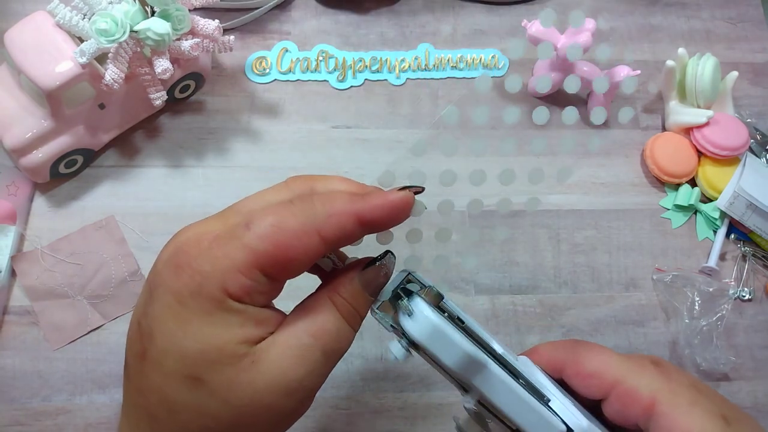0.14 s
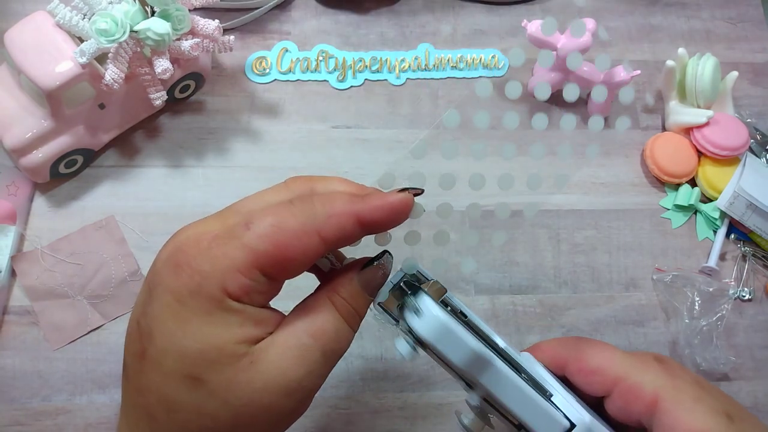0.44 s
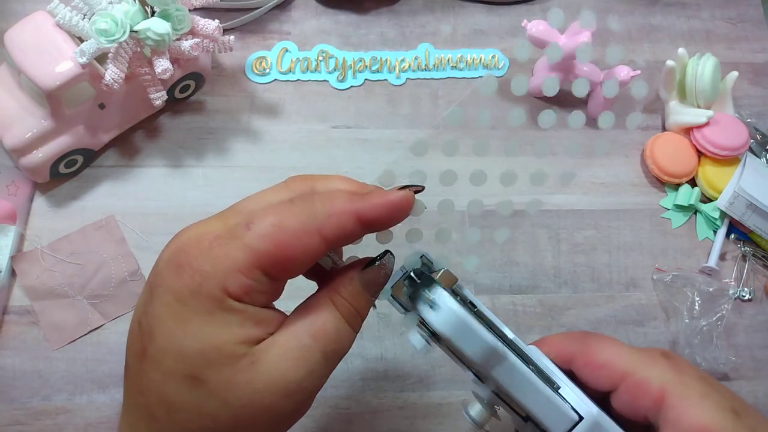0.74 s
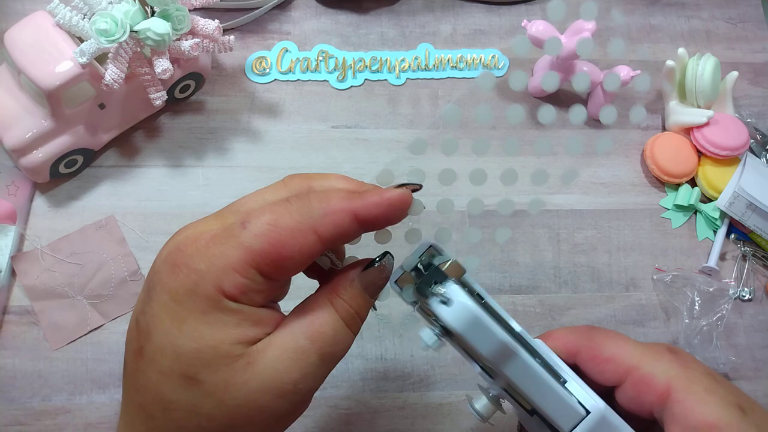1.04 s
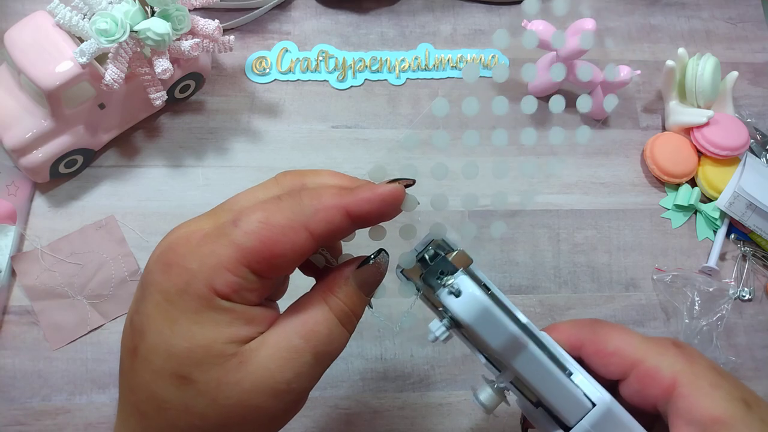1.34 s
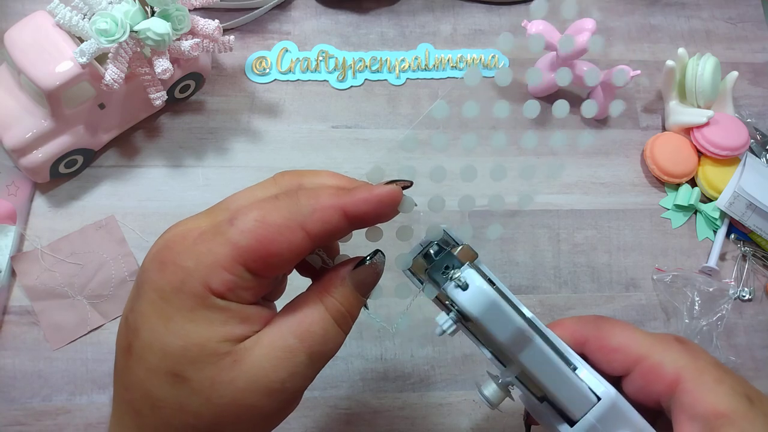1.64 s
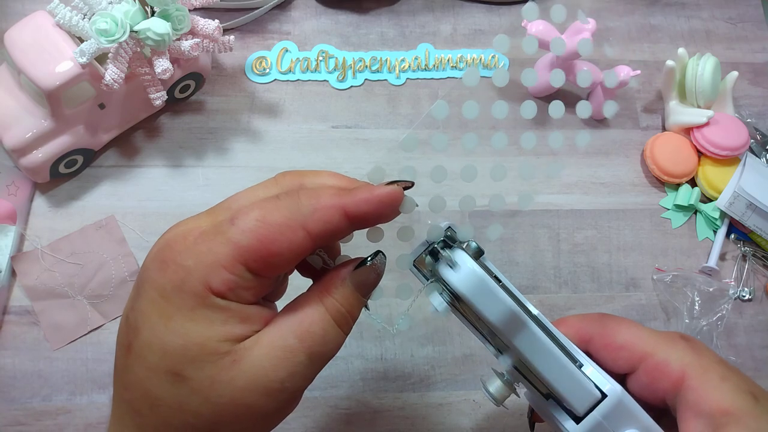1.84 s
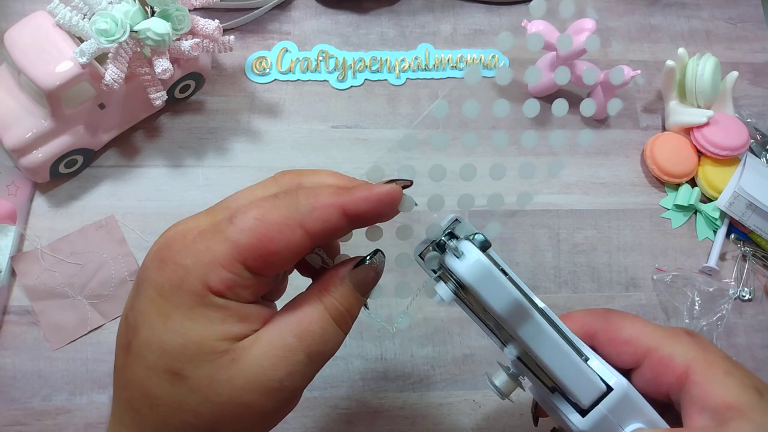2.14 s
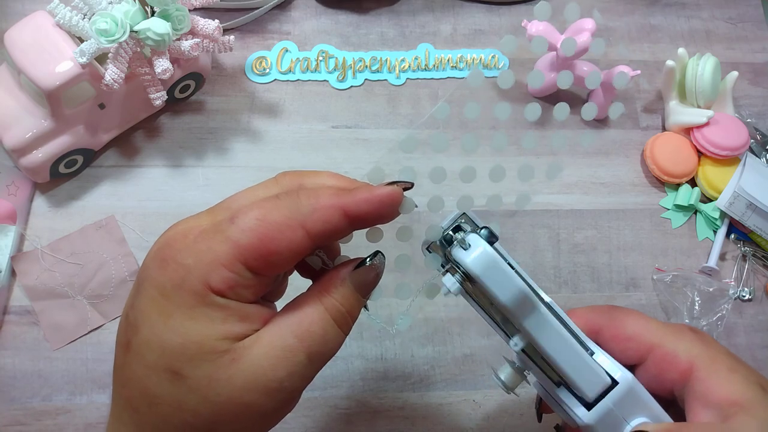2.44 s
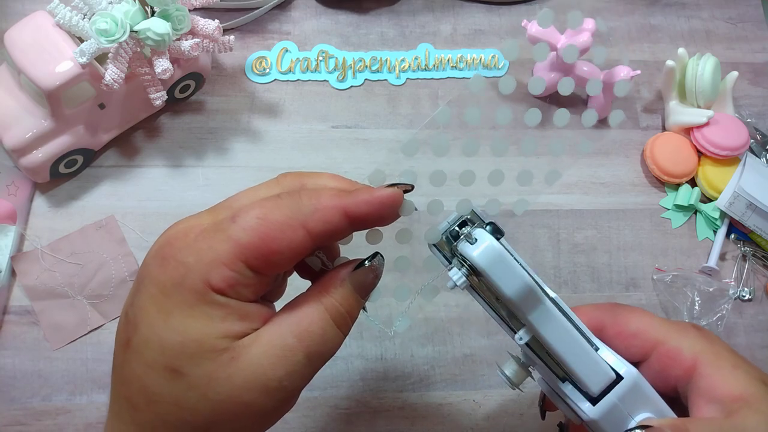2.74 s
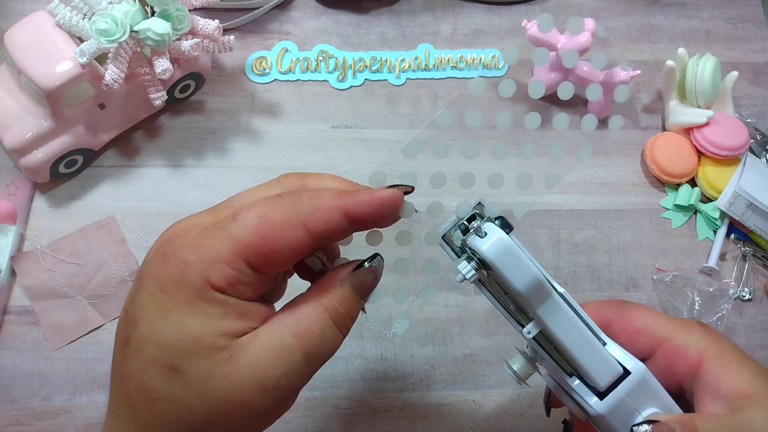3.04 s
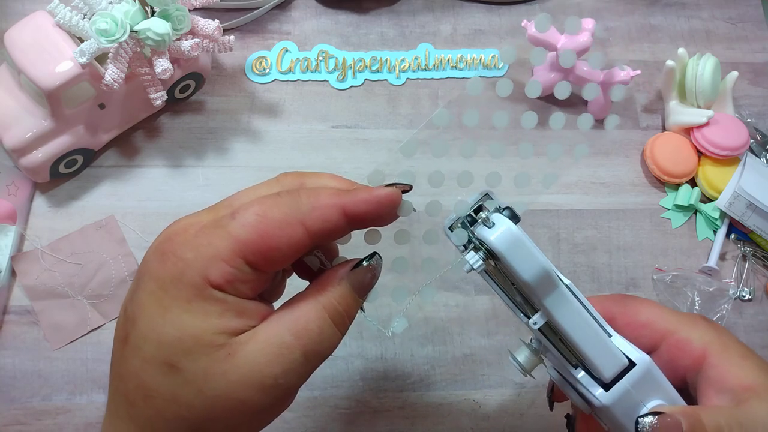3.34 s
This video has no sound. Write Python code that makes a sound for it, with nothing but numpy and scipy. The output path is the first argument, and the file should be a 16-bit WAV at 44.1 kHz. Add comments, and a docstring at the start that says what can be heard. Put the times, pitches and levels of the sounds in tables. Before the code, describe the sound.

Close up, a handheld sewing machine is already running and keeps going to the end: quick regular needle clatter, grainy gear rattle, pulsing high whine and faint motor hum, with a short indoor tail.

```python
"""Handheld sewing machine, close up

A small machine runs close to the microphones, about seven stitches a second through plastic sheet. Every turn
of the crank repeats one pattern: the needle arm clacks, the loose linkage chatters and the plastic gears
rattle, all noise bursts rung through the casing's resonances. Gear whine and a hum near 400 Hz are gliding
sines that swell and sag with the load. A short room tail and a faint low rumble lie underneath."""
import sys
import numpy as np
from scipy import signal
from scipy.fft import rfft, irfft
from scipy.io import wavfile
from scipy.ndimage import uniform_filter1d

SR = 44100
rng = np.random.default_rng(int(sys.argv[2]) if len(sys.argv) > 2 else 0)


def unload_wav(signal):
    """Save mono or channel-first audio to the path in sys.argv[1] as 16-bit WAV at rate SR, clipped to [-1, 1]."""
    wavfile.write(
        sys.argv[1],
        SR,
        np.round(np.clip(np.atleast_2d(signal).T, -1, 1) * 32767).astype(np.int16),
    )


N = 154350
TIME, FREQ = np.arange(N) / SR, np.fft.rfftfreq(N, 1 / SR)

# stitches, each begun by the needle arm's clack: t/s, relative level/dB
STITCH_TABLE = [(-.049, 0), (.096, -2), (.241, 1), (.387, 1), (.531, 3), (.676, -1), (.82, 1), (.964, 1),
                (1.109, 2.5), (1.254, 1), (1.398, -11), (1.543, 0.5), (1.69, -6), (1.836, 0), (1.981, 1.5),
                (2.128, 1), (2.275, -3), (2.421, -2.5), (2.568, 0), (2.715, -6), (2.861, -1), (3.006, 0),
                (3.153, 0.5), (3.301, 0.5), (3.448, -10), (3.594, 0)]
# rattle through one stitch: share of turn, relative levels of bass/dB, low/dB, middle/dB, treble/dB
RATTLE_CYCLE = [(.02, 0, -.5, -1, -1), (.09, -2, -6, -1.5, -1), (.16, -2, -3, -2, -1), (.21, 0, 3, 2, 0),
                (.27, 1, .5, 2.5, -.5), (.33, -1, 0, 3.5, -1.5), (.42, -1, -2, 0, 0), (.5, 0, 3.5, 0, 0),
                (.58, -2, -1.5, .5, 0), (.67, -4, -4.5, -1, -2), (.77, -4, 4, 1.5, 0), (.86, 2, 4, -2, -3),
                (.95, 5, -.5, -2, -2.5)]


def amp(db):
    """Decibels to gain."""
    return 10 ** (np.asarray(db) / 20)


def unit(x):
    """Scales to rms 1."""
    return x / np.sqrt(np.mean(x ** 2) + 1e-20)


def over_freq(table, column=1):
    """One column of a table, interpolated over log frequency."""
    table = np.array(table)
    return np.interp(np.log(FREQ + 1), np.log(table[:, 0]), table[:, column])


def high_pass(hz, order=4):
    """Butterworth high-pass gain over FREQ."""
    return 1 / np.sqrt(1 + (hz / (FREQ + 1)) ** (2 * order))


def waver(hz):
    """Slow random signal of rms 1, low-passed at the given rate."""
    low_pass = np.sqrt(1 - high_pass(hz) ** 2)
    return unit(irfft(rfft(rng.standard_normal(N)) * low_pass, N))


def noise_spectra(envelope):
    """Spectra of two unrelated noises under one envelope."""
    return rfft(envelope * rng.standard_normal((2, N)))


def crank():
    """Turns of the crank over time, one per stitch."""
    return np.interp(TIME, [row[0] for row in STITCH_TABLE], np.arange(len(STITCH_TABLE)))


def each_turn(table):
    """Repeats the columns of a table on every turn of the crank."""
    share, *columns = np.transpose(table)
    turns = crank()
    return [np.interp(turns, share, column, period=1) for column in columns]


def background():
    """Faint low room rumble: shaped noise, partly shared by the two channels."""
    # f/Hz, relative level/dB
    rumble_spectrum = [(20, -16), (45, -11), (72, 4.5), (110, 2), (200, -16), (500, -35), (2000, -60)]
    level_db, width = -68, .35
    mid, side = irfft(noise_spectra(1) * amp(over_freq(rumble_spectrum)), N)
    return amp(level_db) * unit(np.array([mid + width * side, mid - width * side]))


def room(x):
    """Short, faint tail of scattered reflections: exponentially decaying noise, convolved."""
    level_db, t60_s, gap_s = -10, 0.13, .004
    t = TIME[:SR // 2]
    tail = rng.standard_normal((2, len(t))) * amp(-60 * t / t60_s) * (t > gap_s)
    tail /= np.linalg.norm(tail, axis=1)[:, None]
    return amp(level_db) * signal.fftconvolve(x, tail, axes=1)[:, :N]


def casing(drive):
    """Rings noise spectra through the resonances of casing and arm, as each microphone hears them."""
    # broad colour: f/Hz, left level/dB, right level/dB
    slope = [(89.5, -87, -86.5), (197, -78, -77), (287, -70.5, -71.5), (354, -75.6, -72.5), (520, -68, -69),
             (1020, -64, -63), (1790, -62, -54), (3000, -58, -55.5), (6000, -59, -58), (7500, -61, -56),
             (10100, -66.5, -58.5), (12000, -57.5, -63), (15600, -61.5, -65.5)]
    # resonances and dips of casing and arm: f/Hz, width/Hz, left gain/dB, right gain/dB
    modes = [(679, 77, 13, 6.4), (753, 58, 2.5, 16.5), (902, 40, 4.5, 11.5), (1186, 202, 8, 6),
             (1319, 58, 8.5, -0.5), (1408, 68, 10, -6.5), (1736, 67, 13.5, -1), (2283, 280, 9.5, -6),
             (2980, 43, 6.5, 6.5), (3680, 740, 5.5, 2.5), (4230, 144, 3.5, 6.5), (5250, 680, 6.5, 1),
             (5190, 170, -10.3, -5.5), (9370, 690, 7, 2), (11370, 400, -1, 6.5), (14519, 500, 6.5, 1.5)]
    # likeness of the two microphones: f/Hz, coherence
    coherence = [(100, .94), (700, .93), (1200, .85), (2000, .55), (4000, .45), (8000, .3), (15000, .2)]
    # phase by which right leads: f/Hz, lead/rad
    phase_lead = [(100, 0), (250, .1), (450, .7), (700, -.3), (900, .7), (1250, 1.1), (1600, 2.4),
                  (2600, 2.2), (4000, 4.2)]
    body_db, low_hz = 43, 55

    alike = over_freq(coherence)
    shared = alike * drive[0] * np.exp(1j * over_freq(phase_lead))
    pair = np.array([drive[0], shared + np.sqrt(1 - alike ** 2) * drive[1]])
    for k in range(2):
        db = over_freq(slope, k + 1)
        for hz, width_hz, *peak_db in modes:
            db = db + peak_db[k] / (1 + (2 * (FREQ - hz) / width_hz) ** 2)
        pair[k] *= amp(db + body_db) * high_pass(low_hz, order=2)
    # minimum phase of the right-hand colour, applied to both sides
    log_gain = np.log(amp(db))
    lag = signal.hilbert(np.r_[log_gain, log_gain[-2:0:-1]]).imag[:len(FREQ)]
    return irfft(pair * np.exp(-1j * lag), N)


def tone(turns, gain, levels_db, lead_rad):
    """Gliding sine with (left, right) levels; right leads in phase."""
    phase = 2 * np.pi * turns + np.array([[0], [lead_rad]])
    return np.sqrt(2) * amp(levels_db)[:, None] * gain * np.sin(phase)


def gears():
    """One speed, racing when the needle is free and sagging under load, drives whine and overtones; a hum near
    404 Hz follows it only in part."""
    # one stitch: share of turn, nominal tooth rate f/Hz, relative levels of whine/dB, overtones/dB, hum/dB
    mesh = [(.02, 1820, -.5, -1, -4), (.1, 1803, -.5, 0, -4), (.15, 1835, -4, -6, -6),
            (.21, 1925, -14, -4, -4), (.3, 1900, -13, -1, 0), (.34, 1875, -11, -3, 0),
            (.38, 1832, -2, -4, 0), (.45, 1824, -.8, -2, 0), (.52, 1840, -1.2, -5, 1),
            (.57, 1840, .6, -4, -2), (.62, 1822, .2, -2, -6), (.68, 1880, -18, -9, -13),
            (.74, 1970, -14, -8, -19), (.81, 2055, -20, -5, -13), (.87, 1985, -17, -2.5, -7),
            (.92, 1910, -10, 2, -4), (.96, 1875, -4.5, 2, -4)]
    # tooth overtones: multiple, left level/dB, right level/dB, right lead/rad
    overtones = [(2, -31.5, -25, 1.28), (3, -35, -32.5, 0.26), (5, -39, -28.5, 1.05), (6, -36.5, -32, .6),
                 (8, -29, -37, 1)]
    # higher orders of the motor shaft: multiple, left level/dB, right level/dB, right lead/rad
    shaft_orders = [(4, -38.5, -35, 1.5), (6, -45, -42, 0.53), (7, -42.5, -52.5, 1.9), (8, -36, -31, 2.36)]
    pinion_teeth = 9
    speed_jitter, speed_flutter = .005, .007  # rms share of speed
    whine_levels_db, whine_lead_rad = (-16.7, -13), 1.85
    whine_waver_db, whine_rough, whine_smear_turns = .9, .13, .04
    # a faster machine runs above the resonance that carries the whine
    whine_loss_db_per_percent = 0.2
    # for each multiple above the second, as the gears race
    overtone_loss_db_per_percent = 0.7
    shaft_waver_db, shaft_smear_turns = 2, 0.18
    hum_levels_db, hum_hz, hum_follow, hum_smear_turns = (-42.5, -45.5), 404.3, 0.37, 0.086

    pace = uniform_filter1d(np.gradient(crank()), size=26000)
    pace = pace / pace.mean()
    tooth_hz, whine_db, overtone_db, hum_db = each_turn(mesh)
    tooth_hz = tooth_hz * (1 + .7 * (pace - 1))
    tooth_hz = tooth_hz * (1 + speed_jitter * waver(hz=50.3) + speed_flutter * waver(hz=380))
    teeth = np.cumsum(tooth_hz) / SR
    racing = tooth_hz / tooth_hz.mean() - 1

    whine_db = whine_db - whine_loss_db_per_percent * 100 * (pace - 1) + whine_waver_db * waver(hz=25)
    turns = teeth + whine_smear_turns * waver(hz=58.6)
    gain = amp(whine_db) * (1 + whine_rough * waver(hz=287))
    out = tone(turns, gain, whine_levels_db, whine_lead_rad)

    for k, left_db, right_db, lead_rad in overtones:
        loss_db = overtone_loss_db_per_percent * 100 * np.maximum(racing, 0) * (k - 2)
        gain = amp(overtone_db - loss_db + 2.0 * waver(hz=90))
        out += tone(k * teeth, gain, (left_db, right_db), lead_rad)

    low_db = each_turn(RATTLE_CYCLE)[1]  # shaft orders swell with the low rattle
    for k, left_db, right_db, lead_rad in shaft_orders:
        turns = k * teeth / pinion_teeth + shaft_smear_turns * waver(hz=60)
        gain = amp(1.43 * low_db + shaft_waver_db * waver(hz=59))
        out += tone(turns, gain, (left_db, right_db), lead_rad)

    turns = np.cumsum(hum_hz * (1 + hum_follow * racing)) / SR + hum_smear_turns * waver(hz=17.5)
    return out + tone(turns, amp(hum_db + 1.1 * waver(hz=30)), hum_levels_db, lead_rad=0.33)


def rattle():
    """Dense ticks of loose teeth and sliding parts: grainy noise, each register following the crank."""
    register_db = (-1.5, -0.5, -0.86, -2)  # bass, low, middle, treble
    split_hz = (590, 983, 3800)
    ticks_per_s, tick_scatter_db, tick_decay_s, tick_share = 900, 1, 0.00061, 0.3  # decay, share of power

    chance = rng.random(N)
    size = np.minimum(rng.exponential(1, N), 4)
    ticks = (chance < ticks_per_s / SR) * amp(tick_scatter_db * size) ** 2
    power = signal.lfilter([1], [1, -np.exp(-1 / (tick_decay_s * SR))], ticks)
    grain = np.sqrt(1 - tick_share + tick_share * power / power.mean())

    # adjacent high-passes differ by one register's power
    edges = [1] + [high_pass(hz) ** 2 for hz in split_hz] + [0]
    out = 0
    for k, db in enumerate(each_turn(RATTLE_CYCLE)):
        envelope = grain * amp(db + register_db[k] + 0.91 * waver(hz=24.4))
        out = out + noise_spectra(envelope) * np.sqrt(abs(edges[k] - edges[k + 1]))
    return out


def impact(start_s, db, decay_s):
    """Envelope of one impact: quick linear rise under an exponential fall."""
    rise_s = 0.0013
    age_s = np.maximum(TIME - start_s, 0)
    return amp(db) * np.minimum(age_s / rise_s, 1) * np.exp(-np.minimum(age_s / decay_s, 20))


def linkage():
    """Noise bursts: one sharp clack a stitch, then a run of looser knocks, now and then a hard one."""
    # lesser knocks within a stitch: nominal share of turn, nominal level/dB, decay/s, lower edge f/Hz
    knocks = [(0.202, 2.5, 0.0086, 3000), (.255, -5, 0.012, 1500), (.365, 3.5, 0.0055, 1490),
              (0.449, -5.5, .004, 3000), (0.537, 6, 0.003, 2000), (.61, 1.5, 0.0028, 3000),
              (0.746, 6, 0.0048, 8000)]
    # the linkage catches and knocks harder: t/s, level/dB
    catches = [(1.43, 2), (1.478, 8.5), (1.575, 10), (1.6, 9.5), (1.916, 9), (2.021, 9), (2.061, 7),
               (2.624, 6), (3.037, 5), (3.062, 5), (3.208, 5), (3.381, 7.5), (3.481, 8)]
    clack_db, clack_decay_s, clack_lead_s, clack_low_hz = 10.5, 0.0036, 0.002, 4500
    knock_scatter_s, knock_scatter_db = 0.00168, 4
    catch_decay_s, catch_lead_s, catch_low_hz = 0.0054, 0.00265, 2200

    clacks = sum(impact(s - clack_lead_s, clack_db + db, clack_decay_s) for s, db in STITCH_TABLE)
    out = noise_spectra(clacks) * high_pass(clack_low_hz, order=1)

    starts = np.array([row[0] for row in STITCH_TABLE])
    for share, db, decay_s, low_hz in knocks:
        times = starts[:-1] + share * np.diff(starts)
        envelope = 0
        for s, (late, hard) in zip(times, rng.standard_normal((len(times), 2))):
            level_db = db + knock_scatter_db * min(hard, 1)
            envelope = envelope + impact(s + knock_scatter_s * late, level_db, decay_s)
        out += noise_spectra(envelope) * high_pass(low_hz, order=2)

    caught = sum(impact(s - catch_lead_s, db, catch_decay_s) for s, db in catches)
    return out + noise_spectra(caught) * high_pass(catch_low_hz, order=1)


def scene():
    """The machine and its room; the whine feeds the room less than the clatter does."""
    clatter = casing(rattle() + linkage())
    whine = gears()
    return clatter + whine + room(clatter + amp(-6.5) * whine) + background()


def record(dry):
    """The recorder's band limit: a linear-phase low-pass."""
    edge_hz = 15900
    low_pass = signal.firwin(511, edge_hz, window=("kaiser", 9), fs=SR)
    return signal.oaconvolve(dry, low_pass[None], "same")


dry = scene()
out = record(dry)
unload_wav(out)
```